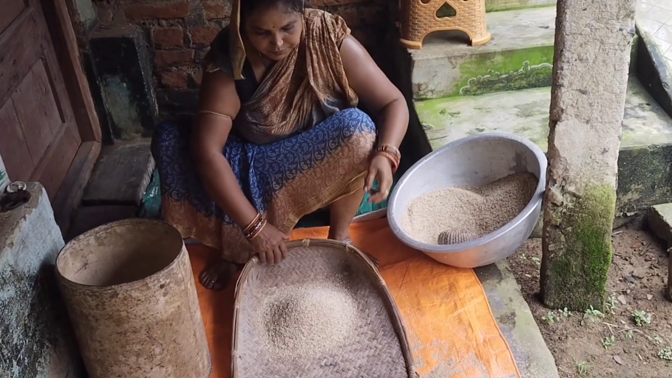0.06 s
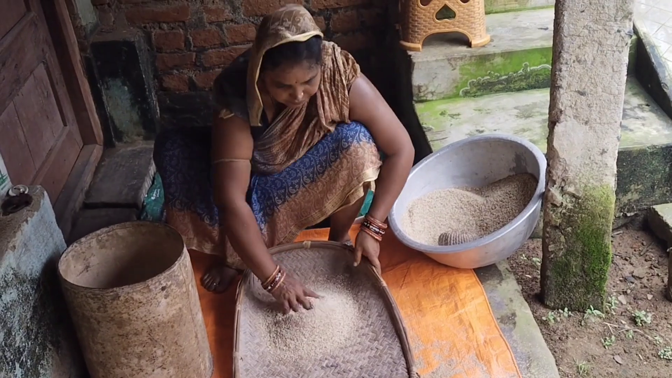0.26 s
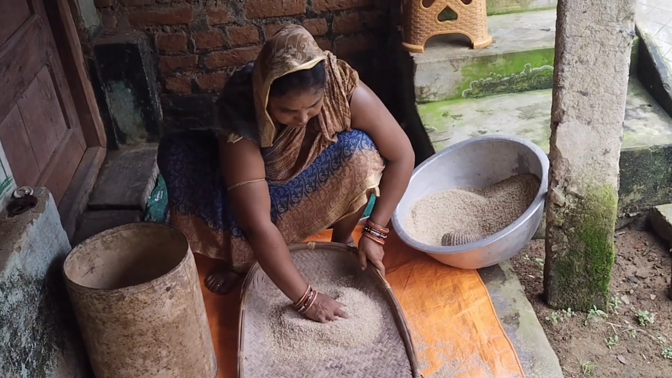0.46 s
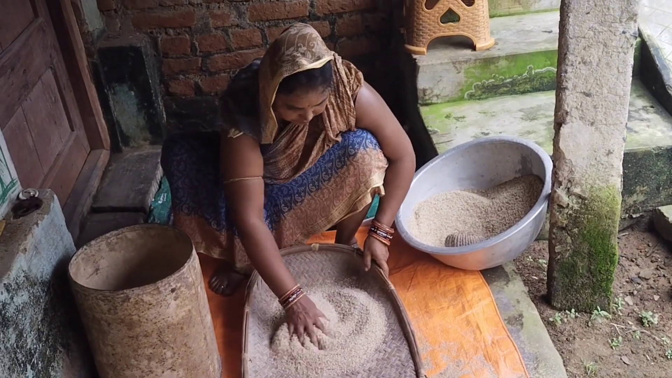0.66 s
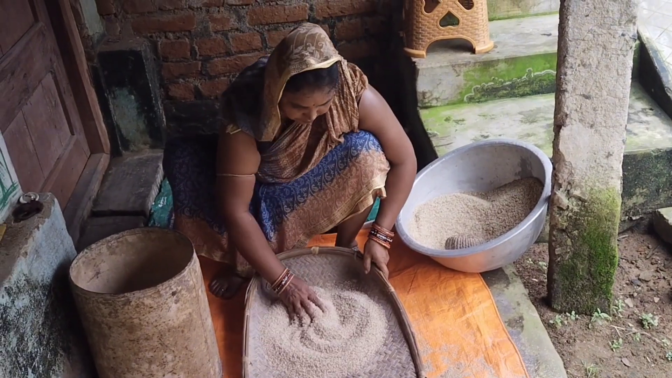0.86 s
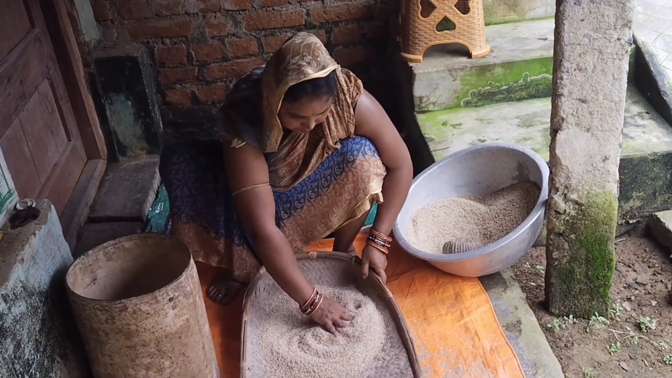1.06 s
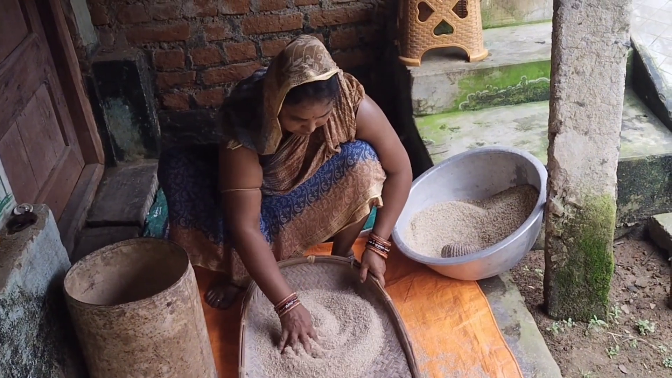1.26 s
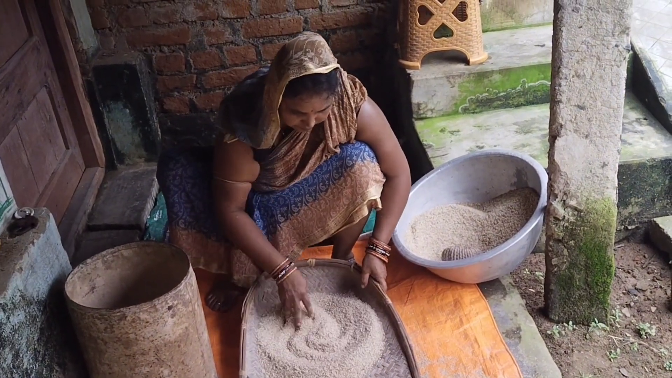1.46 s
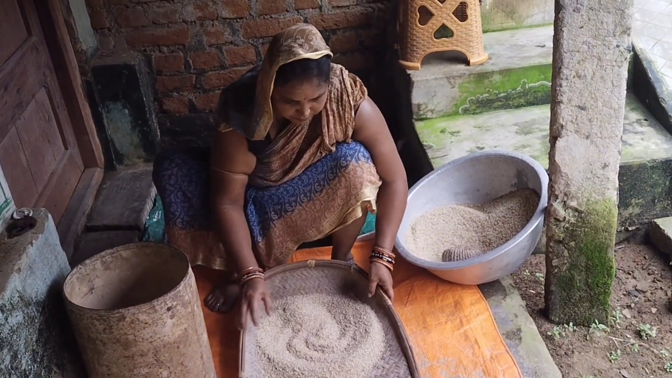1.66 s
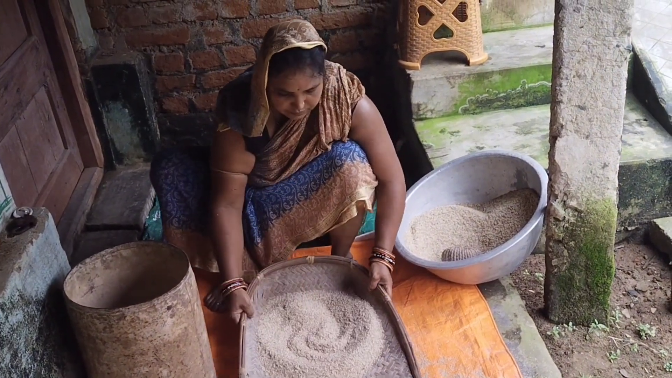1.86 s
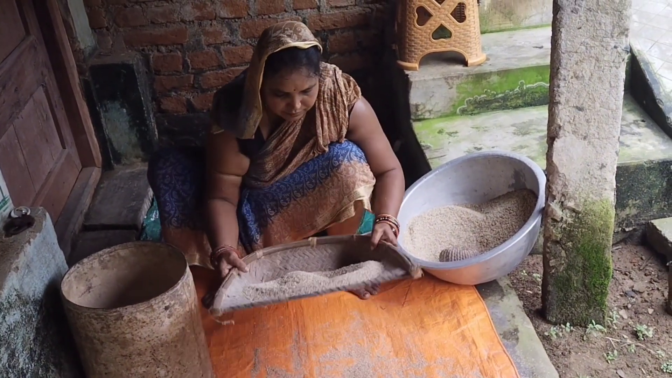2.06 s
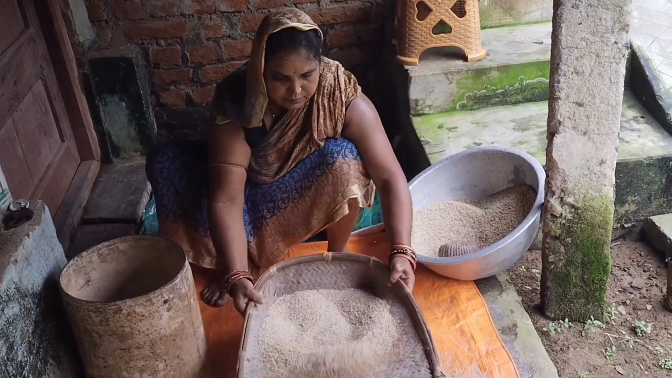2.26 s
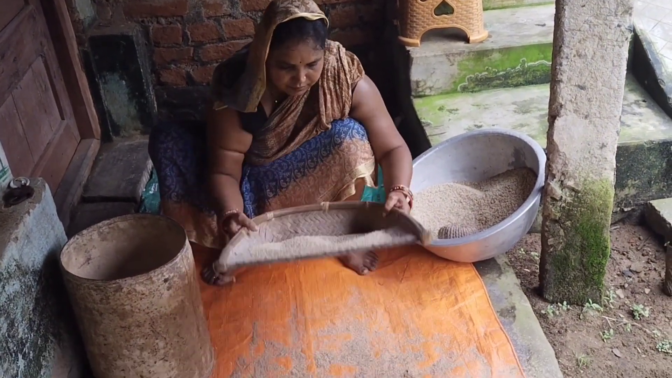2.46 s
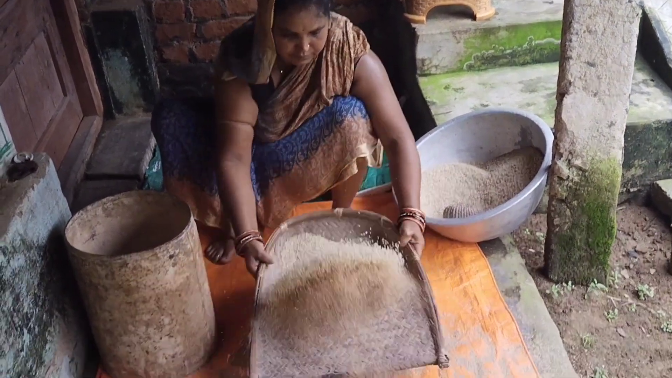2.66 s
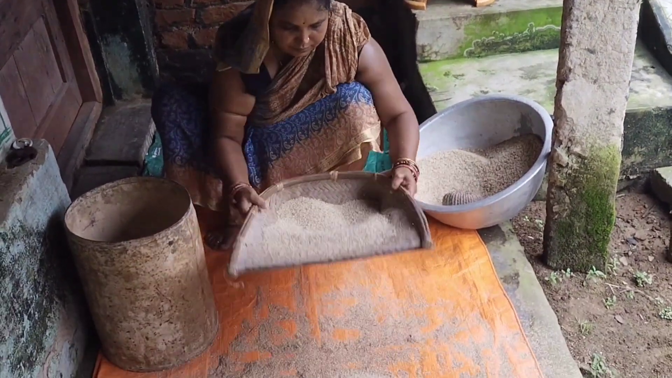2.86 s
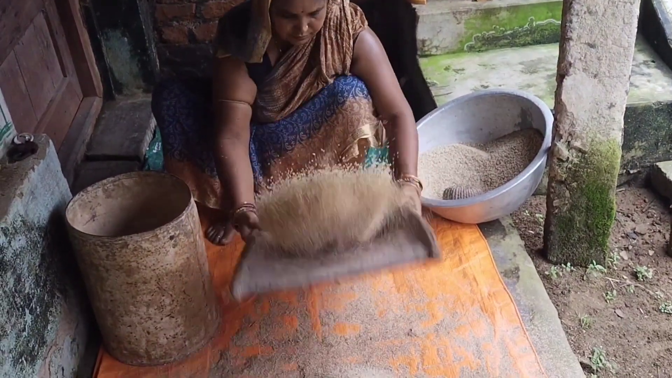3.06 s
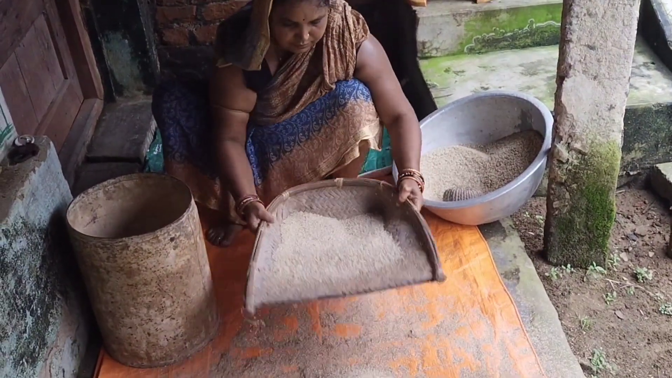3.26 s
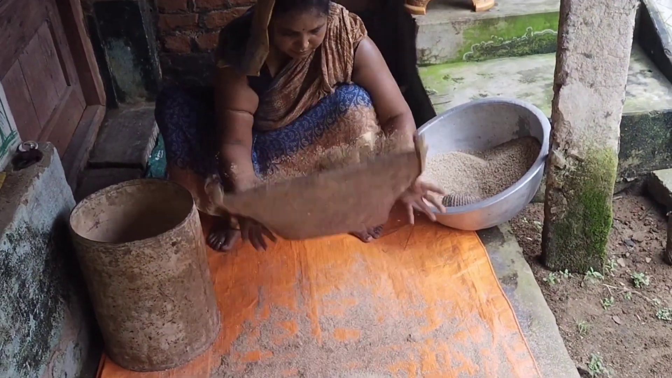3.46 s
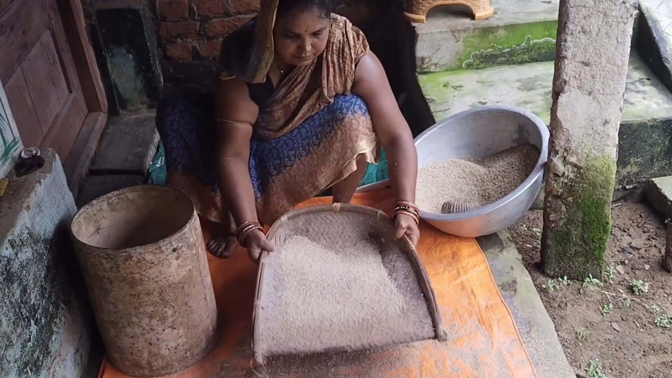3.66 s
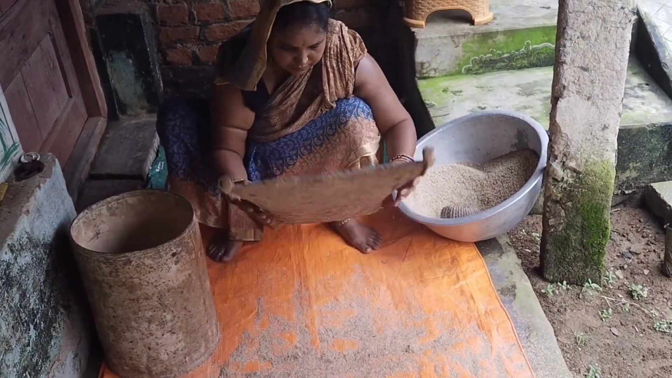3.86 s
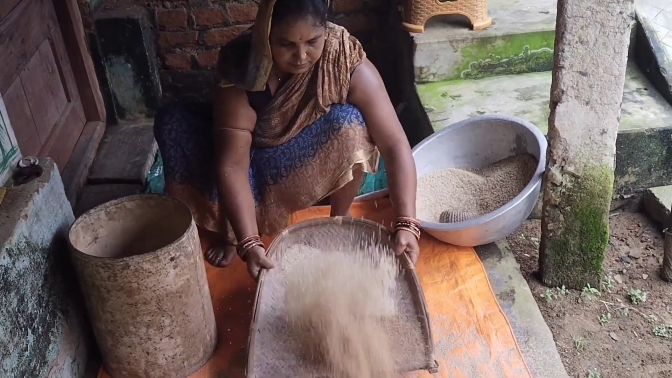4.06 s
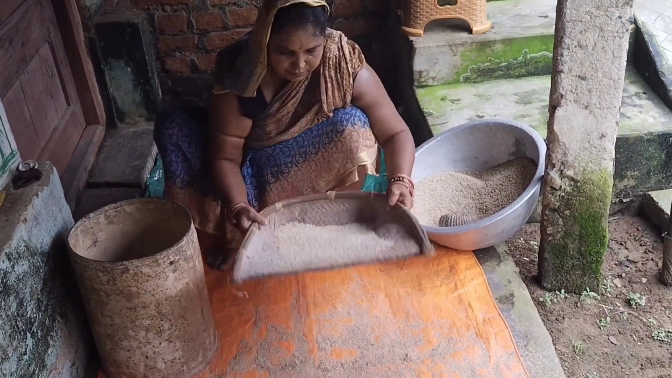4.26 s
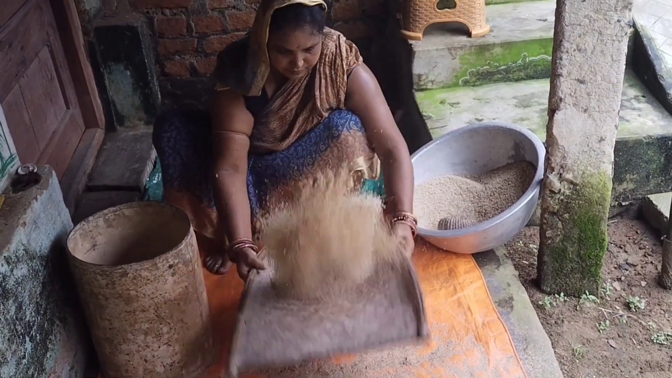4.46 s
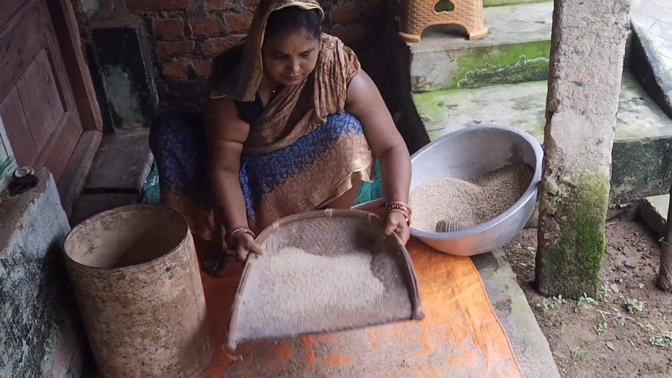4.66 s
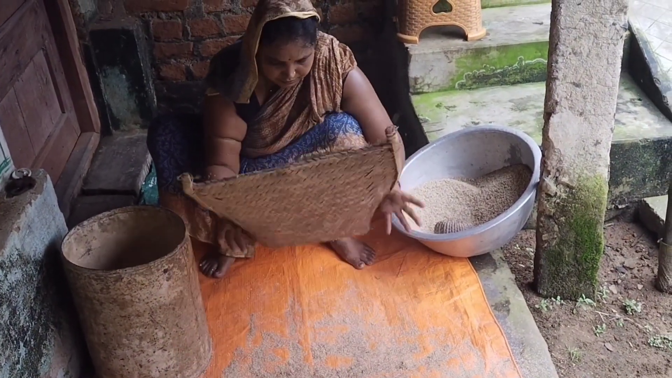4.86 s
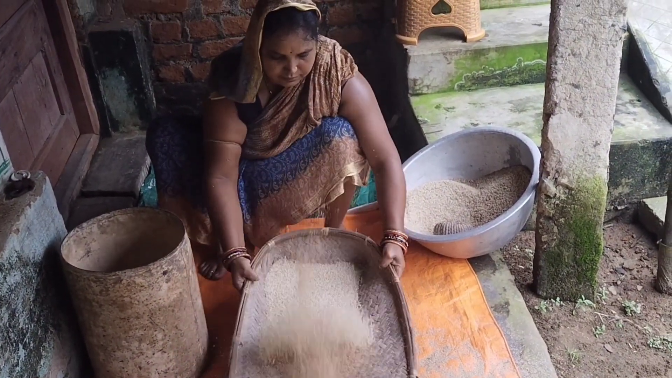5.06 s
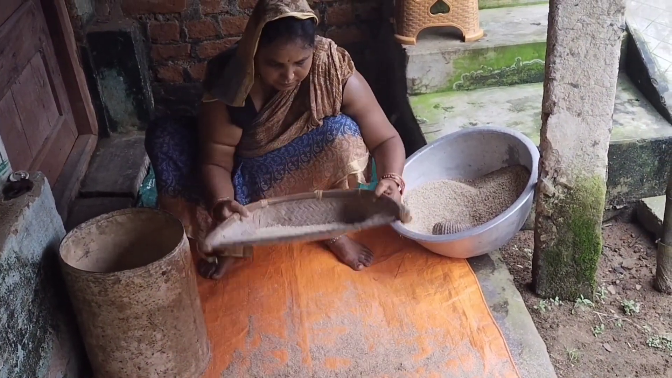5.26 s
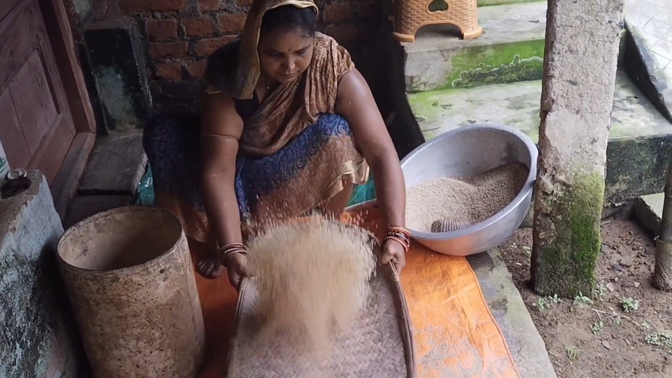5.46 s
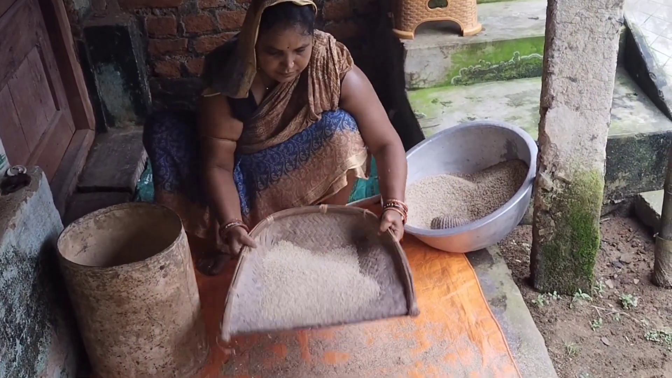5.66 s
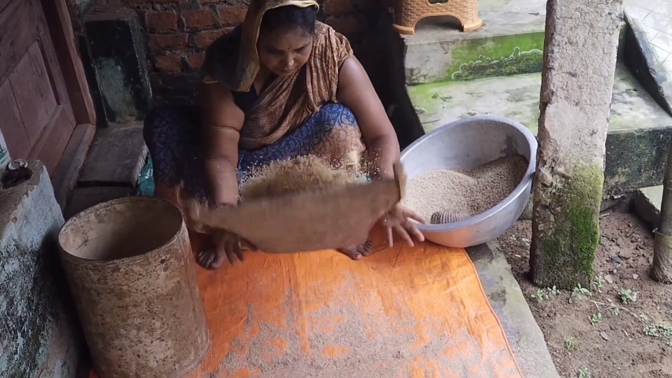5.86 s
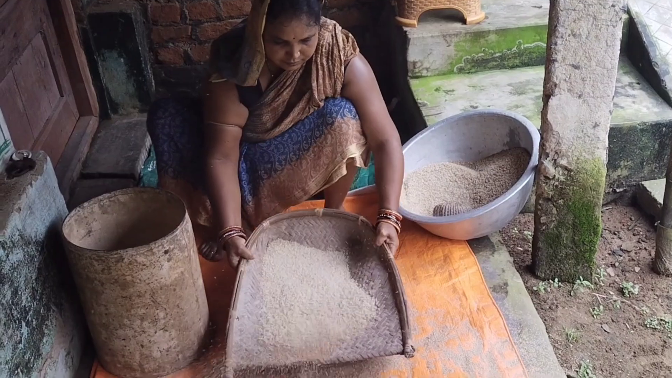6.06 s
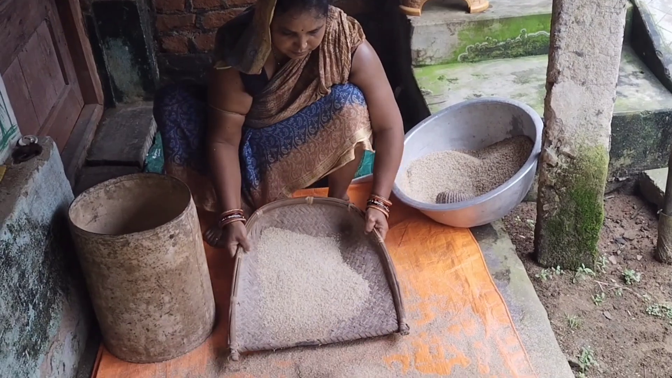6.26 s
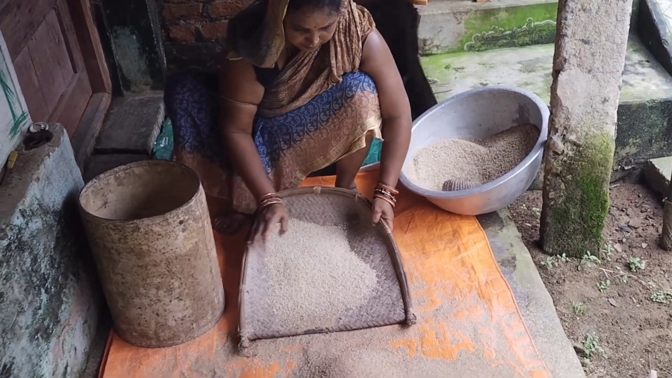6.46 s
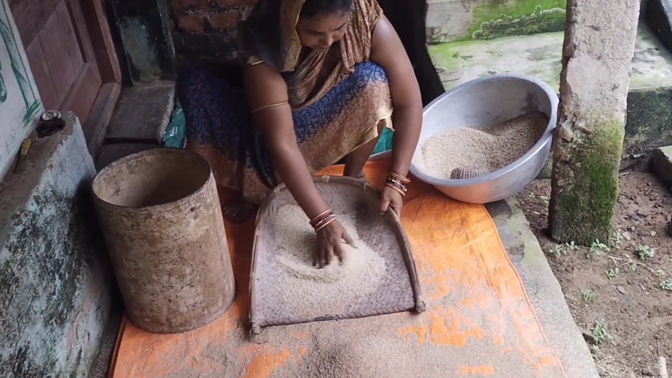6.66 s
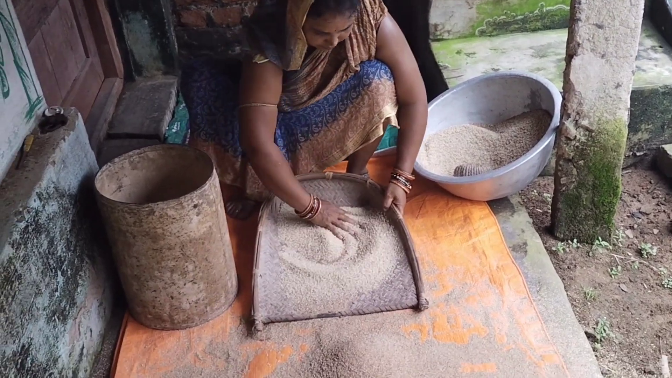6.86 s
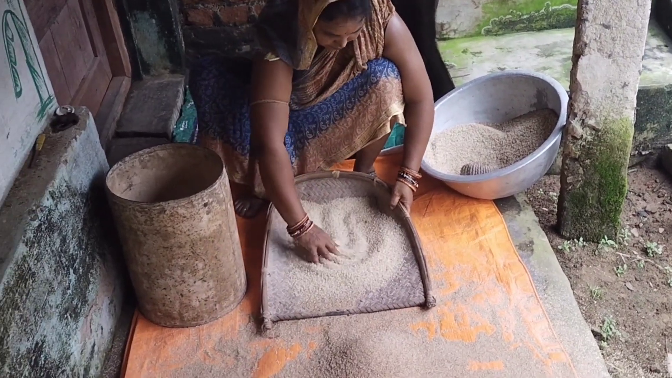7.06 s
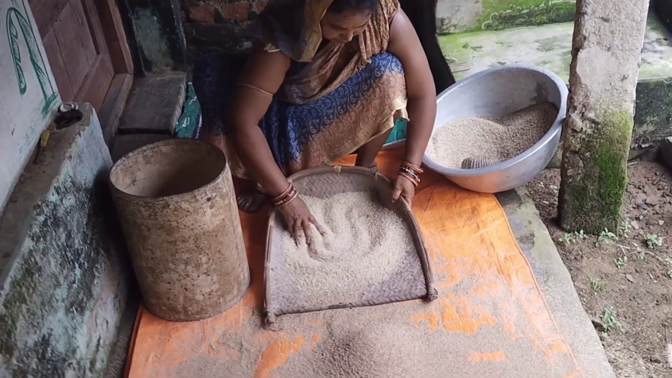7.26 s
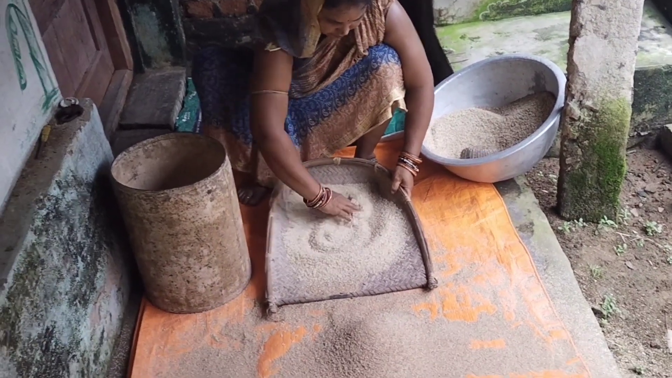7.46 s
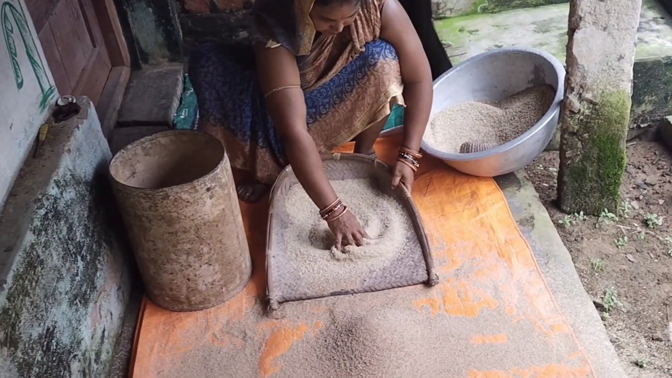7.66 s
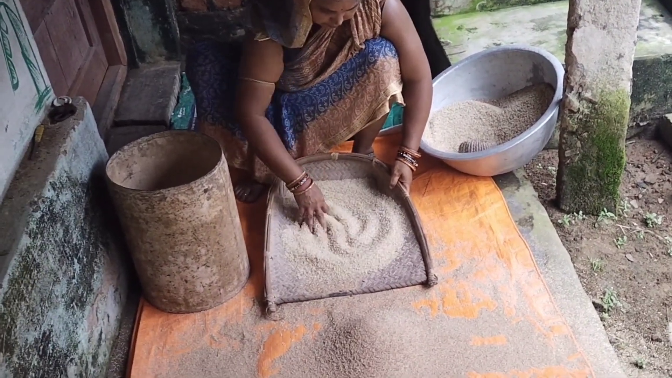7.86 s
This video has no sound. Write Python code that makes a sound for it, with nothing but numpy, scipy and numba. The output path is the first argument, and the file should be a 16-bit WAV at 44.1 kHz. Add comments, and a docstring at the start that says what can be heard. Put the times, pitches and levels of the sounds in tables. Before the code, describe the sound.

Close stereo pickup on a quiet open porch: faint hollow knocks and rubbing hands, then gritty circular strokes through rice. Nine quick tosses follow, the grains slipping with a bright husky hiss and showering back in a dense clatter over a dull, drumming bamboo tray. Bangles tinkle between strokes and a hard tick cracks midway. The tossing stops with small scuffs and ticks, and softer stirring resumes to the end.

```python
"""A porch: rice on a woven bamboo tray close to two microphone ports, the right one nearer. A hand stirs the
rice, the tray tosses it in quick strokes, the hand stirs again. Random grain ticks and short rings are coloured
into clatter, husk hiss and a drumming weave. Filtered noise makes rubbing hands, a thin whistle and a low
rumble under faint air. Decaying modes make the thumps, scuffles and ticks of the tray, clinking glass bangles,
and hollow wooden knocks further off, with echoes from the yard."""
import sys
import numpy as np
from scipy import signal
from scipy.fft import rfft, irfft, next_fast_len
from scipy.io import wavfile
from scipy.ndimage import uniform_filter1d
from numba import njit

SR = 44100
rng = np.random.default_rng(int(sys.argv[2]) if len(sys.argv) > 2 else 0)


def inscribe(sig):
    """Save sig as 16-bit PCM at rate SR to the path in sys.argv[1].

    A 1-D sig is mono; a 2-D sig holds one channel per row.
    Samples are clipped to [-1, 1] before scaling.
    """
    pcm = np.round(np.clip(np.atleast_2d(sig).T, -1, 1) * 32767)
    wavfile.write(sys.argv[1], SR, pcm.astype(np.int16))


N = 349217  # samples

# Low rumble around the porch. Each row: frequency in Hz, level in dB per Hz.
RUMBLE_COLOUR = [(25, -45), (45, -29), (75, 0), (120, 1), (170, -3.5), (250, -4.5), (600, -38)]
# Its swells. Each row: start in seconds, length in seconds, level in dB.
SWELLS = [(-0.003, 0.038, -46.5), (0.79, 0.098, -53), (1.242, 0.14, -56.5), (2.052, 0.015, -44.5),
          (2.447, 0.36, -54.5), (2.93, 0.082, -57), (3.55, 0.041, -56), (4.37, 0.11, -48.5),
          (4.97, 0.046, -53), (5.463, 0.066, -51), (5.913, 0.029, -59), (6.465, 0.037, -53.5),
          (7.21, 0.32, -57), (7.725, 0.11, -62)]
# Faint open air. Each row: frequency in Hz, level in dB per Hz.
AIR_COLOUR = [(25, -2), (60, 13), (150, -23), (400, 11), (1000, -23), (3000, -32), (8000, -39)]
# Far hollow knocks. Each row: time in seconds, peak in dB before the echoes, lowest ring in Hz.
KNOCKS = [(0.14, -23.5, 328), (0.186, -32, 344), (0.214, -34.5, 382), (0.304, -35.5, 384),
          (0.329, -38, 344), (0.369, -30.5, 323), (0.772, -30.5, 426), (1.247, -28.5, 288),
          (1.296, -37.5, 306), (1.457, -36.5, 335), (1.508, -41.5, 312), (1.744, -38.5, 323),
          (1.776, -36.5, 336), (1.811, -39, 325), (1.882, -37, 312), (1.926, -38, 402), (2.467, -34.5, 299),
          (2.493, -36, 300), (2.513, -39, 296), (4.332, -19.5, 337), (4.35, -26, 357), (4.363, -22, 294),
          (4.405, -36, 335), (4.48, -27, 321), (4.575, -29, 299), (4.627, -36, 324), (4.785, -46, 310)]
# Partials of a knock. Each row: multiple of the lowest ring, level in dB.
KNOCK_PARTIALS = [(1, 3), (1.402, -2.5), (2.7, -3)]
# Bangle clinks. Each row: time in seconds, peak of the first touch in dB, most excited frequency in Hz.
CLINKS = [(2.1644, -33.5, 9110), (2.524, -30, 6900), (3.017, -30, 7700), (3.436, -34, 6460),
          (3.924, -29, 6760), (4.366, -43, 6680), (4.373, -35, 9300), (4.39, -22, 11300),
          (4.415, -32, 5890), (4.433, -30.5, 7300), (4.7694, -39, 6750), (4.8329, -32, 9400),
          (4.858, -25, 11700), (4.863, -28.5, 6750), (4.8895, -35, 9250), (5.333, -24, 9500),
          (5.352, -41, 5890), (5.36, -24.5, 5760), (5.443, -34.5, 9100), (5.8326, -29, 7300),
          (5.84, -23, 10700), (5.861, -32, 5980)]
# Glass rings, before each touch varies them. Each row: frequency in Hz, level in dB, 60 dB decay in seconds.
BANGLE = [(5890, 0, .14), (6750, 0, .15), (7130, -8, .07), (9120, -8, .08), (9315, -3, .14),
          (10480, -6, .08), (11245, -1, .18), (11700, -9, .1), (12190, -6, .14), (13600, -10, .08),
          (14900, -10, .1)]
# Boom of the whole tray. Each row: frequency in Hz, level in dB, 60 dB decay in seconds.
TRAY = [(138.5, -13.5, 0.14), (220.7, 1.5, 0.064), (330, -9.5, 0.13), (411.3, -2.5, 0.071),
        (520, -7.5, 0.095)]
# Slap of its strips. Each row: frequency in Hz, level in dB, 60 dB decay in seconds.
SLAP = [(736, 3.5, 0.035), (932, 12.5, 0.023), (1236, 8, 0.016), (1794, 1, 0.037)]
# Hands and heap scuffling on the tray.
# Each row: start in seconds, length in seconds, boom in dB, slap in dB re boom.
SCUFFLES = [(0.767, 0.086, -44, -9), (1.695, 0.052, -60.5, -8), (2.005, 0.084, -48.5, -10),
            (2.084, 0.036, -50, -27), (2.2, 0.012, -45, 6.5), (3.053, 0.034, -47.5, 0),
            (4.94, 0.088, -50.5, 1), (5.457, 0.026, -41.5, -3.5), (5.938, 0.052, -50.5, -1.5)]
# The heap leaving or landing, hands bumping the tray.
# Each row: time in seconds, peak in dB, slap in dB re thump, most excited frequency in Hz.
THUMPS = [(2.246, -29, -3, 219), (2.604, -39, 0.5, 215), (2.693, -29, -3, 352), (3.134, -25, -3, 393),
          (3.592, -30, -2, 486), (4.059, -32, -10, 407), (4.538, -24.5, -19, 312), (4.957, -33, -1, 220),
          (5.034, -29, -18, 243), (5.511, -24, -2, 333), (5.947, -33, -1.5, 230), (6.011, -26, -20, 382),
          (6.267, -42, -16, 540), (6.294, -37.5, -10, 540), (6.463, -40, 0.5, 220), (7.014, -43, 6, 430),
          (7.449, -36.5, 4.5, 563)]
# Single hard ticks on the tray.
# Each row: time in seconds, peak in dB, strongest frequency in Hz, spread of modes in octaves.
TAPS = [(1.002, -15, 1770, 0.47), (1.762, -37.5, 1770, 0.42), (1.787, -29, 3930, 0.59),
        (1.817, -25.5, 3470, 0.17), (2.999, -26, 3570, 0.89), (3.404, -34, 1890, 0.62),
        (4.023, -7, 3300, 0.33), (4.333, -24, 1550, 2.03), (4.427, -36, 1320, 0.47),
        (4.477, -32.5, 1240, 0.47), (4.727, -23, 2820, 1.37), (5.2537, -25, 2840, 0.15),
        (5.509, -13, 2920, 1.4), (6.368, -34, 2370, 1.8), (6.4643, -24, 3270, 1.68),
        (6.491, -28, 3150, 0.4), (6.5917, -37, 1340, 1.07)]
# A thin airy whistle while the heap slips over the weave.
# Each row: start in seconds, length in seconds, level in dB, first Hz, last Hz.
WHISTLES = [(3.477, 0.055, -53.5, 1100, 1390), (5.763, 0.099, -50.5, 1280, 1376),
            (6.233, 0.046, -46.5, 1200, 1216)]
# Bamboo strips of the rim. Each row: frequency in Hz, width in Hz, level in dB.
RIM = [(870, 78, 6), (1340, 98, -9), (1690, 290, 1), (2130, 180, 0.5), (2710, 84, -2), (3280, 86, 0),
       (3720, 75, 0), (3970, 87, 0), (4460, 130, -16)]
# Hands rubbing the rim. Each row: start in seconds, length in seconds, level in dB, most excited frequency in Hz.
RUBS = [(0.042, 0.037, -49, 1750), (0.106, 0.1, -56, 3700), (0.26, 0.016, -46.5, 3200),
        (0.319, 0.03, -48.5, 1490)]
# Colours of the rice: clatter, husk hiss, flying spray, weave, belly of the tray.
# Each row: frequency in Hz, level in dB per Hz.
CLATTER = [(300, -69), (900, -17), (1300, 1.5), (2100, 10), (3200, 8), (4200, 3.5), (6000, -26)]
HUSK = [(1500, -112), (3200, -14.5), (5000, -5), (5900, -1.5), (7200, -3), (8000, -8), (9500, -10),
        (12000, -23)]
SPRAY = [(4000, -77), (7000, -18), (9500, 0), (12000, 6), (15500, -10)]
WEAVE = [(100, -85), (380, -18), (540, -16.5), (660, -7.5), (780, -1), (900, -3), (1020, -3.5), (1220, 1),
         (1400, -7), (1800, -6), (3000, -59)]
BELLY = [(100, -43), (250, -14), (420, -3), (560, 3.5), (750, -12.5), (1500, -94)]
# Off the ground the belly sounds. Each row: time in seconds, belly level in dB re weave.
LIFTED = [(1.65, -30), (1.9, -6), (6.3, -9), (6.55, -32)]
# A light slide lacks the low clatter. Each row: frequency in Hz, gain in dB.
LIGHT = [(1500, -25), (2000, -5.5), (2600, -2.5)]
# A hand stirring the heap, one list for each spell.
# Each row: time in seconds, clatter in dB, husk hiss in dB re clatter, weave in dB re clatter.
STIRS = [
    [(.39, -57, -21, 5), (.414, -43.5, -16.5, -6), (.495, -39, -5, -8.5), (.512, -42.5, -6, -5),
     (.74, -39, -9, -5), (.86, -43.5, -6.5, -3.5), (.96, -40, -6, -10.5), (1.06, -35.5, -12, -16),
     (1.226, -43, -5, -5.5), (1.3, -49, -11, 1.5), (1.36, -47.5, -9.5, -3.5), (1.47, -45.5, -7, 4.5),
     (1.574, -43.5, -7.5, -13), (1.635, -55, -6, -9), (1.665, -72, -12, 8)],
    [(6.593, -51, -2, -5), (6.616, -45, -5, -2.5), (6.68, -39, -5.5, 0.5), (6.798, -43, -5.5, -2),
     (6.836, -38.5, -1, -11.5), (6.96, -36.5, -4.5, -13), (7.02, -40.5, -6, -9), (7.1, -39.5, -3.5, -6),
     (7.19, -48.5, -3, 4), (7.302, -38.5, -8.5, -4.5), (7.432, -41, -2.5, -4.5), (7.644, -38, -3.5, -5),
     (7.776, -45.5, -7, 2.5), (7.919, -42.5, -6.5, 0.5)],
]
# Tossed rice showering back. Each row: end in seconds, length in seconds, crest in dB, then first clump,
# lull, last grains and stragglers in dB re crest, then husk and weave at the crest in dB re clatter.
SHOWERS = [(2.351, 0.14, -30.5, -15, -13.5, 0, -8.5, -1.3, -10.5),
           (2.8, 0.15, -32, -6.5, -5, 1.5, -8.5, -2.2, -6),
           (3.265, 0.16, -32, -4, -5.5, -3.5, -11, -0.49, -4.5),
           (3.709, 0.12, -30.5, 1.5, -4.5, -3, -10.5, -1.4, -6.5),
           (4.203, 0.15, -31.5, -4, -2, -2, -10, -0.94, -6.5),
           (4.667, 0.12, -28, 1, -7, -2, -12.5, -1.9, -7.5),
           (5.168, 0.15, -30, -1, -2, -5, -11.5, -1.3, -9.5),
           (5.647, 0.13, -28.5, -1, -6.5, -3.5, -12, -0.3, -8),
           (6.135, 0.14, -29, -6, -2, -2.5, -11.5, -0.29, -7)]
# The heap sliding as the tray is gripped, tilted or flicked up. Each row: start in seconds, length in seconds,
# clatter in dB, husk in dB re clatter, weave in dB re clatter, fade in dB per second.
SLIDES = [(0.0, 0.032, -45.5, -7.5, -2, -700), (0.085, 0.058, -59, 4.5, 2, -400),
          (0.173, 0.09, -64.5, 8, 4.5, -300), (0.26, 0.07, -61.5, -0.5, 4.5, -300),
          (1.704, 0.022, -69, 9.5, -7, -700), (1.78, 0.066, -49, -5, -3.5, -200),
          (1.902, 0.067, -40.5, -13, -5, -200), (1.975, 0.1, -54, -7.5, -1.5, -200),
          (2.107, 0.27, -46, 0, -29, -150), (2.558, 0.042, -45, -1.5, -18, -200),
          (3.005, 0.0054, -46, 4.5, -6, -250), (3.421, 0.09, -48, -1.5, -17, -200),
          (3.82, 0.074, -43.5, -4.5, -8.5, -200), (3.881, 0.21, -40.5, -1.5, -23, -200),
          (4.23, 0.01, -54, 8.5, -24, -200), (4.342, 0.0057, -42, -23, 0, -350),
          (4.405, 0.11, -48, -2.5, -5, -300), (4.688, 0.049, -48.5, 2.5, -20, -500),
          (4.843, 0.085, -45.5, -3, -16.5, -250), (5.182, 0.041, -49, 6.5, -31, -350),
          (5.337, 0.16, -53, 1, -20, -200), (5.673, 0.019, -53, 9, -24, -200),
          (5.815, 0.11, -45.5, -2, -12.5, -200), (6.225, 0.081, -47, -3, -8.5, -400),
          (6.364, 0.03, -45.5, -8.5, -5.5, -450), (6.469, 0.014, -48.5, -24, -6, -600),
          (6.506, 0.025, -66.5, 15, -25, -700)]
# Difference between the microphone ports. Each row: frequency in Hz, left minus right in dB.
PORTS = [(60, -4), (250, 2.5), (600, -0.5), (1300, -0.5), (2400, 4.5), (5000, 5.5), (7500, 10.5),
         (9000, -8), (13000, 0.5)]

SWELL_RISE_DB_S, SWELL_FALL_DB_S, LULL_DB, AIR_DB = 266, -124, -67, -73
KNOCK_T60_S, KNOCK_RISE_S = 0.042, .009  # decay of the lowest partial
YARD_T60_S, YARD_DB = 0.3, -2.5
REBOUNDS, REBOUND_S, REBOUND_DB = 3, .035, -7  # loose bangles touch again: latest delay, least loss
# the many short overtones of glass on glass: strongest level re the rings
CHATTER_DB, CHATTER_T60_S, CHATTER_LO_HZ = -19, .08, 9500
BUMPS_PER_S, SCUFFLE_RISE_DB_S, SCUFFLE_FALL_DB_S = 400, 607, -700
THUMP_RISE_S, SLAP_RISE_S = .009, .01
TAP_RISE_S = .006  # at no spread; a wider tick rises faster
WHISTLE_WAVERS_PER_S, WHISTLE_EDGE_DB_S = 200, 700
RUB_RISE_DB_S, RUB_FALL_DB_S = 700, -400
# at each port: chances of a tick, ticks that sound; dB per unit of random hardness
CHANCES_PER_S, TICKS_PER_S, TICK_SPREAD_DB = 24000, 13000, 2
SLIP_DB, SLIPS_PER_S = 1.15, 45
RING_DB = 0  # ringing grains re ticks
STIR_EDGE_DB_S, SLIDE_RISE_DB_S = 2500, 620
LEAD_S, ONSET_DB_S = 0.021, 541  # the first grains arrive abruptly, this long before the clump rises
CLUMP_S, CLUMP_DB = 0.014, 9.5  # the first clump lands all at once: its rise
FIRST_GRAINS_DB_S, LULL_S, CREST_S = 100, 0.026, 0.036  # climb to the clump; lull after it; crest before the end
DROP_S, TRICKLE_DB_S = 0.012, -100  # the shower breaks off, stragglers trickle on
WEAVE_GROWTH = 1.13  # dB of weave per dB of shower: it takes weight to drive it
HEAVY_DB, HEAVY_SPAN_DB = -46, 3.5  # clatter level at which it fills out, and how gradually
SPRAY_DB, SPRAY_GROWTH = -20, 0.65  # re husk hiss at -41.5 dB; further dB gained per dB of husk hiss
PATCHY_LIGHT_DB, PATCHY_HEAVY_DB, PATCHES_PER_S = 3.2, 1.5, 40
ALIKE_BELOW_HZ, TOP_HZ = 1130, 15500
LEFT_LATE = 6  # samples, the tray is nearer the right port
FULL_SCALE = .55  # peaks are rounded off towards this


def undb(db):
    """Amplitude ratio of a level in dB."""
    return 10 ** (np.asarray(db) / 20)


def colour(x, points, lo_hz=None, hi_hz=None):
    """Shape x by (Hz, dB) points; with band edges, scale that band of the channels' mean to rms 1."""
    size = next_fast_len(N)
    hz = np.arange(size // 2 + 1) * SR / size + 1e-3  # keeps the logarithm finite at 0 Hz
    p = np.array(points, float)
    spec = rfft(x, size) * undb(np.interp(np.log(hz), np.log(p[:, 0]), p[:, 1]))
    if lo_hz:
        band = np.abs(spec.mean(axis=0)[(hz > lo_hz) & (hz < hi_hz)]) ** 2
        spec = spec / np.sqrt(2 * band.sum() / size / N)
    return irfft(spec, size)[..., :N]


def curves(rows):
    """Columns of a table, joined by straight lines in time."""
    s, *columns = np.transpose(rows)
    return [np.interp(np.arange(N) / SR, s, c) for c in columns]


def walk(rate):
    """Random levels held 1 / rate s and slewed twice; spread near 1."""
    k = int(SR / rate)
    steps = np.repeat(rng.standard_normal(N // k + 1), k)
    return 1.15 * uniform_filter1d(uniform_filter1d(steps, k), k)[:N]


def plateau(s, length_s, rise_db_s, fall_db_s):
    """Attack, hold from s, release: dB under the top."""
    t = np.arange(N) / SR - s
    return np.minimum(0, np.minimum(rise_db_s * t, fall_db_s * (t - length_s)))


def ports(pair):
    """Long waves reach both ports nearly alike, short ones nearly unrelated."""
    size = next_fast_len(N)
    mid, side = rfft(pair, size)
    hz = (np.arange(len(mid)) + 1) * SR / size
    apart = 1 / (1 + (ALIKE_BELOW_HZ / hz) ** 3) + 0.08
    return irfft(mid + np.sqrt(apart) * side * np.array([[1], [-1]]), size)[:, :N] / np.sqrt(2)


def add(out, s, peak_db, modes, rise_s):
    """Ring (Hz, dB, t60, phase) modes around time s in both ports, swelling over the contact."""
    t = np.arange(int(max(m[2] for m in modes) * SR)) / SR
    ring = sum(undb(db - 60 * t / t60) * np.sin(2 * np.pi * hz * t + phase) for hz, db, t60, phase in modes)
    ring = ring * np.sin(np.pi / 4 * np.minimum(t / rise_s, 2)) ** 2
    i = int((s - rise_s / 2) * SR)
    ring = ring[:N - i] * undb(peak_db) / np.abs(ring).max()
    out[:, i:i + len(ring)] += ring


def background():
    """A low rumble that comes and goes, over faint open air: two coloured noises."""
    noise = rng.standard_normal(N) + .25 * rng.standard_normal((2, N))  # mostly common to both ports
    rumble = colour(noise, RUMBLE_COLOUR, 50, 170)
    air = colour(ports(rng.standard_normal((2, N))), AIR_COLOUR, 81, 15000)
    power = undb(2 * LULL_DB)
    for s, length_s, db in SWELLS:
        power = power + undb(2 * (db + plateau(s, length_s, SWELL_RISE_DB_S, SWELL_FALL_DB_S)))
    return rumble * np.sqrt(power) + air * undb(AIR_DB + 3 * walk(6.3))


def knocks():
    """Hollow wooden blows; the yard walls return them as a decaying noise tail."""
    direct = np.zeros((2, N))
    for s, db, hz in KNOCKS:
        modes = [(hz * m, d, KNOCK_T60_S / m, 0) for m, d in KNOCK_PARTIALS]
        add(direct, s, db, modes, KNOCK_RISE_S)
    t = np.arange(SR // 2) / SR
    echoes = rng.standard_normal(len(t)) + 0.45 * rng.standard_normal((2, len(t)))
    echoes = echoes * undb(-60 * t / YARD_T60_S) * (1 - np.exp(-t / 0.0078))
    echoes = echoes * undb(YARD_DB) / np.sqrt(np.mean(np.sum(echoes ** 2, axis=1)))
    return direct + signal.fftconvolve(direct, echoes, axes=1)[:, :N]


def bangles():
    """Every touch wakes the glass rings in new proportions, most near the struck one, amid a bright chatter."""
    out = np.zeros((2, N))
    for s, db, near_hz in CLINKS:
        for k in range(REBOUNDS + 1):
            chance = rng.random((60, 2))
            late, soft = chance[-1] * (k > 0)
            modes = []
            for (hz, d, t60), (a, b) in zip(BANGLE, chance):
                away_db = (8 + 40 * a) * abs(np.log2(hz / near_hz))
                modes.append((hz * (.996 + .007 * b), d - away_db, t60 * (.25 + .35 * b), 99 * a))
            for a, b in chance[20:50]:
                chatter_hz = CHATTER_LO_HZ + (TOP_HZ - CHATTER_LO_HZ) * a
                modes.append((chatter_hz, CHATTER_DB - 6 * a, CHATTER_T60_S, 2 * np.pi * b))
            add(out, s + REBOUND_S * late, db + REBOUND_DB * ((k > 0) + soft), modes, .005)
    return out


def scuffles():
    """Runs of small uneven bumps ring the tray and its strips, alike at both ports."""
    bumps = (rng.random((2, N)) < BUMPS_PER_S / SR) * rng.standard_normal((2, N))
    out = 0
    for k, modes in enumerate((TRAY, SLAP)):  # separate bumps for boom and slap
        ring = np.zeros((2, SR // 4))
        add(ring, .001, 0, [(*m, 0) for m in modes], .001)
        rung = signal.fftconvolve(bumps[k], ring[0])[:N]
        swell = 0
        for s, length_s, db, slap_db in SCUFFLES:
            shape_db = plateau(s, length_s, SCUFFLE_RISE_DB_S, SCUFFLE_FALL_DB_S)
            swell = swell + undb(db + k * slap_db + shape_db)
        out = out + rung / rung.std() * swell
    return out


def thumps():
    """The whole tray booms and its strips slap, a little detuned by the load each time."""
    out = np.zeros((2, N))
    for s, db, slap_db, near_hz in THUMPS:
        chance = rng.standard_normal(5)
        boom = [(hz * (1 + 0.0686 * a), d - 9 * abs(np.log2(hz / near_hz)), t60, 0)
                for (hz, d, t60), a in zip(TRAY, chance)]
        slap = [(hz * (1 + 0.055 * a), d + 3 * a, t60, 0) for (hz, d, t60), a in zip(SLAP, chance)]
        add(out, s, db, boom, THUMP_RISE_S)
        add(out, s, db + slap_db, slap, SLAP_RISE_S)
    return out


def taps():
    """Each tick rings a dense, short cluster of bamboo strip modes."""
    out = np.zeros((2, N))
    for s, db, hz, octaves in TAPS:
        modes = []
        for a, b in rng.uniform(-0.55, 1, (90, 2)):
            mode_hz = min(hz * 2 ** (octaves * a), TOP_HZ)
            modes.append((mode_hz, -9 * abs(a), 0.023 / 2 ** (octaves * a / 2), np.pi * b))
        add(out, s, db, modes, TAP_RISE_S / (1 + 2 * octaves))
    return out


def whistles():
    """A narrow band of noise gliding between two pitches."""
    t, out = np.arange(N) / SR, 0
    waver = walk(WHISTLE_WAVERS_PER_S) + 1j * walk(WHISTLE_WAVERS_PER_S)
    for s, length_s, db, start_hz, end_hz in WHISTLES:
        turn = 2 * np.pi * np.cumsum(np.interp(t, [s, s + length_s], [start_hz, end_hz])) / SR
        level_db = db + plateau(s, length_s, WHISTLE_EDGE_DB_S, -WHISTLE_EDGE_DB_S)
        out = out + undb(level_db) * np.exp(1j * turn)
    return (out * waver).real


def rubs():
    """Fine friction noise rings the strips of the rim, most of all those under the fingers."""
    size, out = next_fast_len(N), 0
    hz = np.arange(size // 2 + 1) * SR / size
    noise = rfft(rng.standard_normal((2, N)) * undb(4 * walk(90)), size)
    for s, length_s, db, near_hz in RUBS:
        strips = sum(undb(d - 8.4 * abs(np.log2(f / near_hz))) / (1 + (2 * (hz - f) / width) ** 2)
                     for f, width, d in RIM)
        rub = irfft(noise * strips, size)[:, :N]
        out = out + rub / rub.std() * undb(db + plateau(s, length_s, RUB_RISE_DB_S, RUB_FALL_DB_S))
    return out


def hardness(shape):
    """Most impacts are alike, a few much harder."""
    return undb(TICK_SPREAD_DB * np.minimum(rng.exponential(size=shape), 3))


def ticks():
    """A dense rain of grain impacts at each port."""
    out, count = np.zeros(2 * N), int(CHANCES_PER_S * 2 * N / SR)
    sounds = rng.random(count) < TICKS_PER_S / CHANCES_PER_S
    places = rng.integers(0, 2 * N, count)
    np.add.at(out, places, sounds * rng.standard_normal(count) * hardness(count))
    return out.reshape(2, N)


@njit
def strike(start, turn, size, cycles):
    """Damped rings, each of its own pitch, fading by 1 / e in so many cycles."""
    out = np.zeros(N)
    for k in range(len(start)):
        z, p = size[k] + 0j, np.exp(turn[k] * (1j - 1 / (2 * np.pi * cycles)))
        for i in range(start[k], min(start[k] + int(6 * np.pi * cycles / turn[k]), N)):
            out[i] += z.imag
            z *= p
    return out


def rings(lo_hz, hi_hz, cycles, per_s):
    """Some grains and bamboo strips ring on after the impact, each at its own pitch."""
    count = int(per_s * N / SR)
    turn = 2 * np.pi / SR * lo_hz * (hi_hz / lo_hz) ** rng.random((2, count))  # radians per sample
    start, size = rng.integers(0, N, (2, count)), hardness((2, count)) * turn
    return np.array([strike(start[c], turn[c], size[c], 1. * cycles) for c in (0, 1)])


def voice(rain, points, lo_hz, hi_hz, cycles, per_s):
    """Ticks and rings in one colour, near rms 1 in the band, wavering a little."""
    ringing = rings(.8 * lo_hz, 1.2 * hi_hz, cycles, per_s)
    both = colour(rain, points, lo_hz, hi_hz) + undb(RING_DB) * colour(ringing, points, lo_hz, hi_hz)
    return both / np.sqrt(1 + undb(2 * RING_DB)) * undb(SLIP_DB * walk(SLIPS_PER_S / 2))


def stirring():
    """Powers of clatter, husk and weave as the hand stirs, following drawn levels."""
    power = 0
    for rows in STIRS:
        db, husk_db, weave_db = curves(rows)
        db = db + plateau(rows[0][0], rows[-1][0] - rows[0][0], STIR_EDGE_DB_S, -STIR_EDGE_DB_S)
        power = power + undb(2 * np.array([db, db + husk_db, db + weave_db]))
    return power


def shower(end_s, length_s, first_db, lull_db, last_db, stragglers_db):
    """First grains, a clump, a lull, a swell to the crest, a sudden drop, a trickle: dB re the crest."""
    rise_s = -CLUMP_S - length_s
    s = end_s + np.array([rise_s - LEAD_S - 1, rise_s - LEAD_S, rise_s, -length_s, LULL_S - length_s,
                          -CREST_S, 0, DROP_S, DROP_S + 1])
    before_db = first_db - CLUMP_DB
    lead_db = before_db - FIRST_GRAINS_DB_S * LEAD_S
    db = [lead_db - ONSET_DB_S, lead_db, before_db, first_db, lull_db,
          0, last_db, stragglers_db, stragglers_db + TRICKLE_DB_S]
    return np.interp(np.arange(N) / SR, s, db)


def showering():
    """Powers of clatter, husk and weave as tossed rice falls back; the weave follows its weight more steeply."""
    power = 0
    for end_s, length_s, db, *shape_db, husk_db, weave_db in SHOWERS:
        fall = undb(2 * shower(end_s, length_s, *shape_db))
        top = undb(2 * (db + np.array([[0], [husk_db], [weave_db]])))
        power = power + np.array([fall, fall, fall ** WEAVE_GROWTH]) * top
    return power


def sliding():
    """Powers of clatter, husk and weave as the heap slides: a steep rise, a hold, a fade."""
    power = 0
    for s, length_s, db, husk_db, weave_db, fade_db_s in SLIDES:
        slide = undb(2 * plateau(s, length_s, SLIDE_RISE_DB_S, fade_db_s))
        power = power + slide * undb(2 * (db + np.array([[0], [husk_db], [weave_db]])))
    return power


def patchy(x, depth_db):
    """Each half octave swells and dips on its own as grains catch here and there."""
    size = next_fast_len(N)
    spec = rfft(x, size)
    octave = np.log2((np.arange(size // 2 + 1) + 1) * SR / size / 1000)  # re 1 kHz
    octave = np.clip(octave, -.5, 3.5)
    out = 0
    for centre in np.arange(-.5, 4, .5):
        band = irfft(spec * np.maximum(0, 1 - 2 * abs(octave - centre)), size)[:, :N]
        out = out + band * undb(depth_db * walk(PATCHES_PER_S))
    return out


def rice():
    """Grains knock each other, husks scrape, the weave answers; the heap slides in small slips."""
    # powers add, over a floor of -120 dB
    clatter_db, husk_db, weave_db = 10 * np.log10(1e-12 + stirring() + showering() + sliding())
    rain = ticks()
    clatter = voice(rain, CLATTER, 1500, 4500, cycles=24, per_s=600)
    heavy = 1 / (1 + np.exp((HEAVY_DB - clatter_db) / HEAVY_SPAN_DB))
    clatter = heavy * clatter + (1 - heavy) * colour(clatter, LIGHT)
    husk = voice(rain, HUSK, 5000, 10000, cycles=45, per_s=700)
    weave = voice(rain, WEAVE, 650, 1300, cycles=20, per_s=110)
    belly = colour(rain, BELLY, 340, 590) * undb(curves(LIFTED)[0])
    drum = ports(weave + belly)
    # flying grains reach higher than sliding ones
    spray = colour(rain, SPRAY, 9000, 13000)
    spray_db = husk_db + SPRAY_DB + SPRAY_GROWTH * (husk_db + 41.5)
    heap = clatter * undb(clatter_db) + husk * undb(husk_db)
    heap = heap + spray * undb(spray_db) + drum * undb(weave_db)
    heap = patchy(heap, heavy * PATCHY_HEAVY_DB + (1 - heavy) * PATCHY_LIGHT_DB)
    return heap * undb(SLIP_DB * walk(SLIPS_PER_S))


def scene():
    """The rice close by, the sounds of hands, tray and bangles, and the porch behind them."""
    return rice() + rubs() + whistles() + knocks() + thumps() + scuffles() + taps() + bangles() + background()


def record(dry):
    """Each port has its own colour, the left hears a little later; peaks are rounded, the top is cut."""
    left = colour(dry[0], [(hz, db / 2) for hz, db in PORTS])
    right = colour(dry[1], [(hz, -db / 2) for hz, db in PORTS])
    left = np.concatenate([np.zeros(LEFT_LATE), left[:-LEFT_LATE]])
    rounded = FULL_SCALE * np.tanh(np.array([left, right]) / FULL_SCALE)
    top_cut = signal.ellip(10, .2, 80, TOP_HZ, fs=SR, output="sos")
    return signal.sosfilt(top_cut, rounded)


dry = scene()
out = record(dry)
inscribe(out)
```